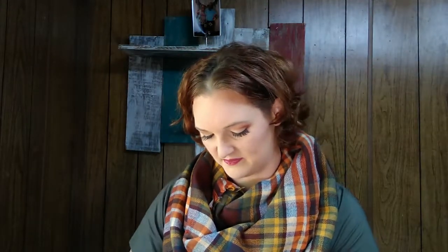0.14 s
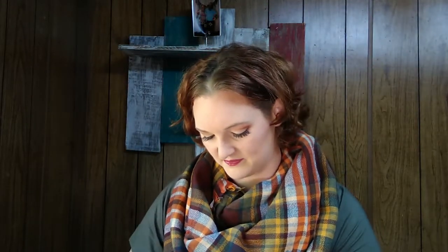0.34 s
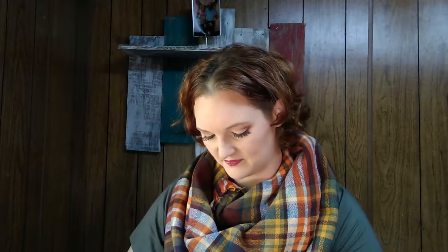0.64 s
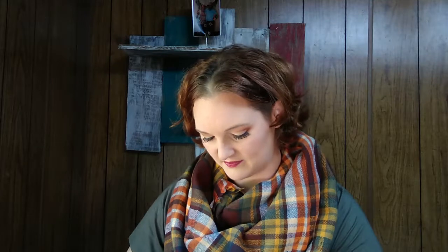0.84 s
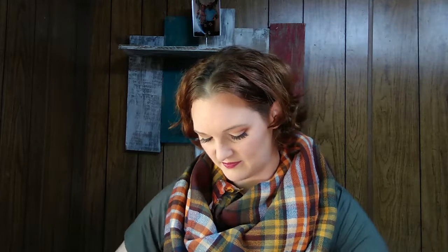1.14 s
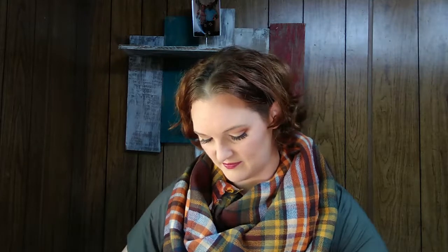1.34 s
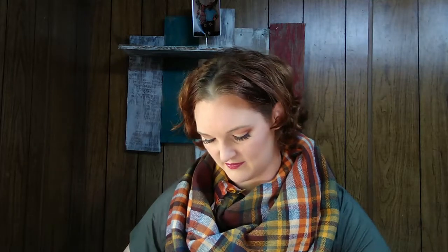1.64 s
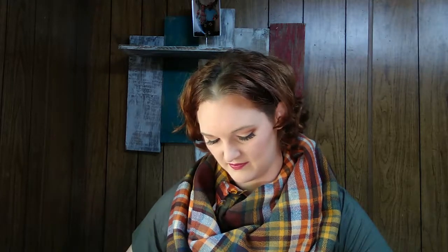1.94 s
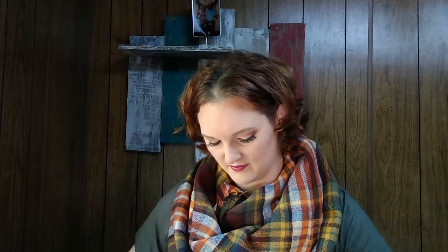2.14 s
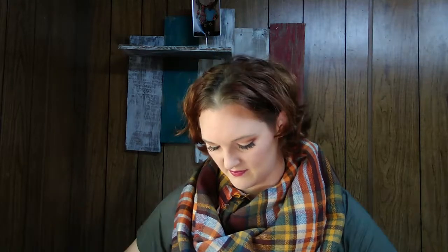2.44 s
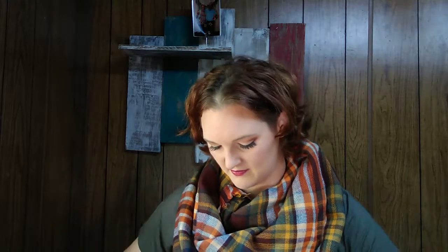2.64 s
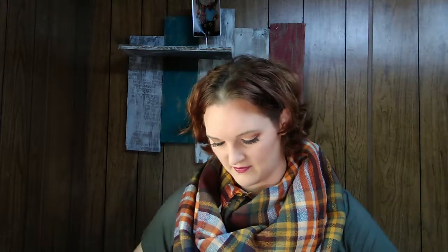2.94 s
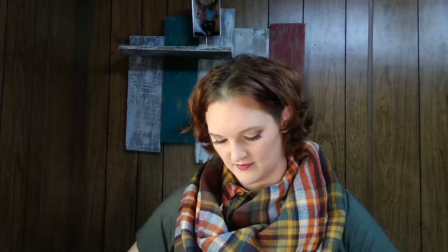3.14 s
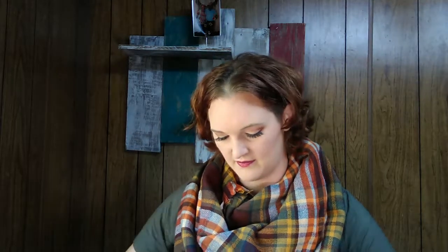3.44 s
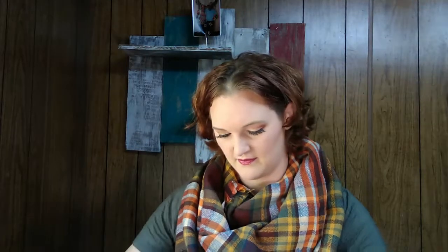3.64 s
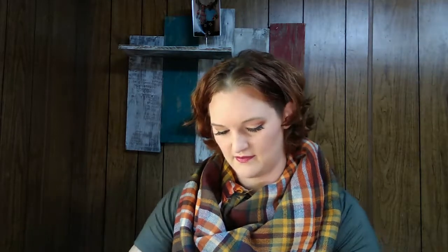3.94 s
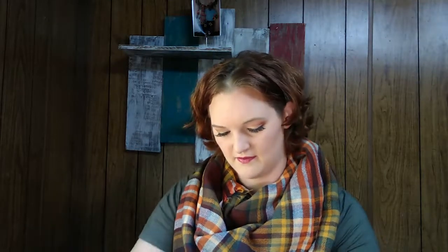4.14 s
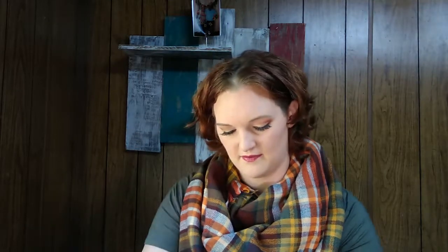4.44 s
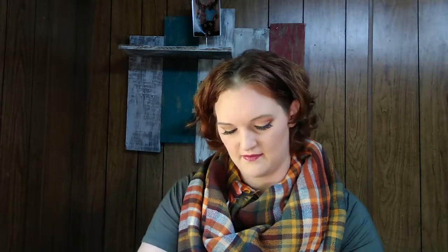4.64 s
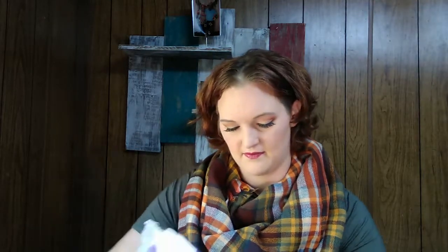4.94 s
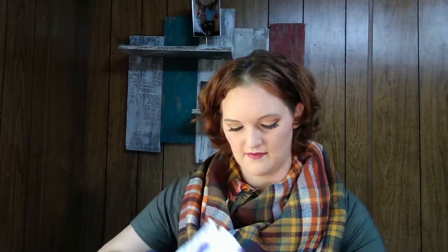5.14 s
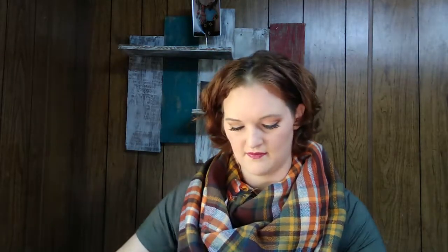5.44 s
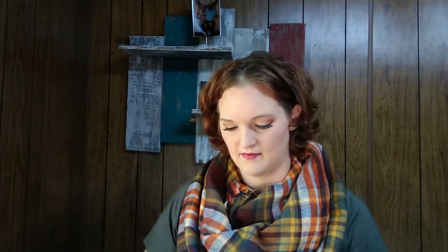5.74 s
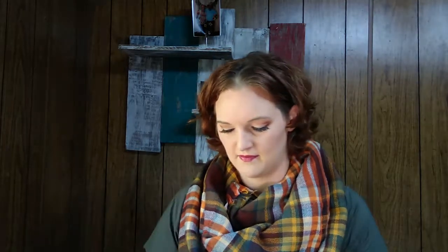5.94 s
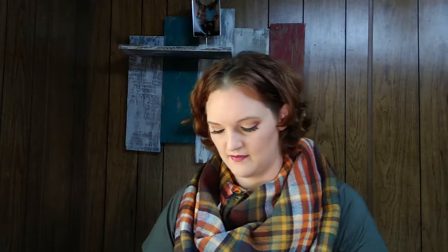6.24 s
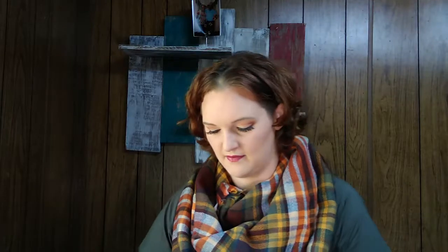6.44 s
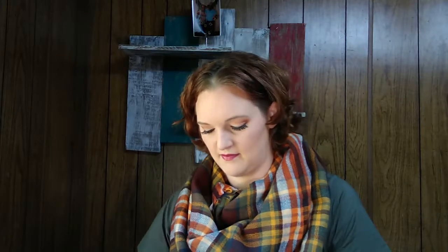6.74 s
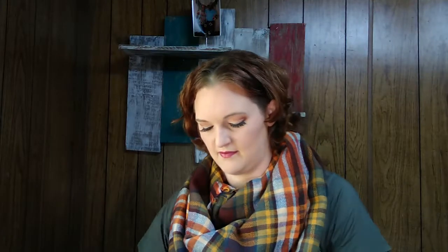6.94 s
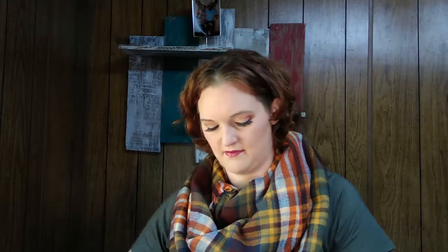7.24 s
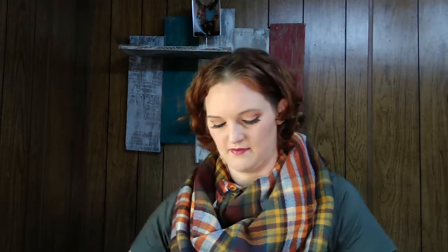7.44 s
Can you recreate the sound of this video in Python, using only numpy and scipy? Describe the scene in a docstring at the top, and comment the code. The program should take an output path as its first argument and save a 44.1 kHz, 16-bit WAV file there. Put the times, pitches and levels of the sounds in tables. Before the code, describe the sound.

Close, crisp paper crinkling and snapping as hands unwrap a box, with brief tears, fine sharp clicks and faint low cardboard bumps.

```python
"""A dense, dry crackle comes first: two hands pull wrapping paper off a box and crumple it in a small wooden room.
Thousands of random creases snap each second, and each rings a patch of paper: small patches crackle high and short,
large ones sound low and longer. Short rips and sharp single ticks stand out of the steady crumpling.
The cardboard box rumbles low and gives a dull note when bumped. Close, faint echoes surround it all.
Two microphone ports just above hear it with slightly different colour."""
import sys
import numpy as np
from scipy import signal
from scipy.fft import rfft, irfft, next_fast_len
from scipy.io import wavfile
from scipy.ndimage import uniform_filter1d

SR = 44100
rng = np.random.default_rng(int(sys.argv[2]) if len(sys.argv) > 2 else 0)


def dump(signal):
    """Clip the signal to [-1, 1] and save it as 16-bit WAV at the path in sys.argv[1]."""
    limited = np.clip(np.atleast_2d(signal).T, -1, 1)
    pcm = np.round(limited * 32767).astype(np.int16)
    wavfile.write(sys.argv[1], SR, pcm)


N = 334719  # length in samples


def gain_of(db):
    """Turns decibels into a factor for the sound wave."""
    return 10 ** (np.asarray(db) / 20)


def evened(x):
    """Scales a signal to an average strength (rms) of 1."""
    return x / np.sqrt(np.mean(x ** 2) + 1e-20)


def read(points, hz):
    """Reads a table of (frequency, value) between its points, on a log-frequency axis."""
    f, value = np.transpose(points)
    return np.interp(np.log(hz + 1), np.log(f + 1), value)


def add(mix, s, sound):
    """Mixes a sound in, starting at s seconds and cut off at the end of the mix."""
    part = mix[..., round(s * SR):][..., :sound.shape[-1]]
    part += sound[..., :part.shape[-1]]


def shaped(x, gain):
    """Filters a sound by a gain that is a function of frequency."""
    size = next_fast_len(x.shape[-1] + 2048)
    spectrum = rfft(x, size) * gain(np.fft.rfftfreq(size, 1 / SR))
    return irfft(spectrum, size)[..., :x.shape[-1]]


def alike(pair):
    """Blends two unrelated signals: long low waves reach both ports much alike, high ones differ."""
    # how alike left and right are: frequency_hz, likeness (1 = same, 0 = unrelated)
    likeness = [(60, .8), (150, .8), (330, .95), (600, .82), (1000, .38), (1400, .33), (2100, .48),
                (2500, .35), (3100, -.08), (4200, .1), (6000, 0)]
    shared = shaped(pair[0], lambda hz: read(likeness, hz))
    own = shaped(pair[1], lambda hz: np.sqrt(1 - read(likeness, hz) ** 2))
    return np.array([pair[0], shared + own])


def wrinkle_db(fold_db, crease_db):
    """Wrinkles lie between folds and creases in size, so their level follows both."""
    return 0.47 * fold_db + 0.55 * crease_db - 6.0


def hands_db():
    """How hard the hands work through time: drive levels of swing, flex, folds, wrinkles and creases."""
    # steady crumpling: time_s, crease_db, then levels above the creases: fold_db, flex_db, swing_db
    # (flex is the sheet bending, swing is the whole sheet moving); levels glide from one point to the next
    handling = [(0.0, -47.5, -9, -14.5, -35), (0.34, -48, -7.5, -12.5, -15.5), (0.55, -50, -10.5, -13, -43),
                (0.67, -53.5, 3.5, -4, -15), (0.8, -59.5, -14.5, -12, -42), (0.93, -50, 11, -3, -7),
                (1.08, -55.5, 1, -5.5, -9), (1.27, -58, -7.5, -11.5, -32), (1.39, -49.5, -2, -7.5, -9.5),
                (1.58, -47, -7, -10.5, -18.5), (1.73, -51, -8, -13.5, -22), (1.82, -49, 7.5, 3.5, -7),
                (2.01, -59.5, -11, -16.5, -30), (2.07, -52, -9.5, -13, -18), (2.2, -50.5, -3.5, -11.5, -23),
                (2.3, -57, -6.5, -15, -42), (2.39, -44, -9, -15.5, -18), (2.58, -42.5, -3.5, -10, -29.5),
                (2.62, -46.5, 0.5, -7.5, -18.5), (2.83, -69, -3.5, -10, -31), (3.0, -70, -10, -35, -40),
                (3.13, -58, -0.5, -5.5, -36), (3.28, -54.5, -6.5, -12, -31), (3.55, -47, -11, -14, -46),
                (3.61, -49.5, -4, -16, -26), (3.66, -45.5, -12, -16, -36), (3.85, -54.5, -7, -9.5, -31),
                (3.97, -62, -4.5, -21.5, -43), (4.18, -59, -6, -20, -35), (4.23, -56, 4, -12, -9),
                (4.35, -49, -8, -12, -29), (5.12, -38.5, -9.5, -12.5, -26.5), (5.3, -48, -5, -10.5, -15.5),
                (5.43, -47, -11, -14, -34), (5.69, -54.5, -3.5, -3.5, -10), (5.94, -53.5, -14, -22.5, -52),
                (5.98, -54.5, -12, -8.5, -25), (6.21, -41, -6.5, -11.5, -21.5),
                (6.38, -44.5, -7, -9.5, -26.5), (6.55, -43.5, -5, -11, -15.5), (6.72, -52.5, -7, -6.5, -32),
                (6.81, -44.5, -4.5, -5.5, -16), (6.91, -47, -8.5, -9.5, -24), (7.19, -62.5, 0.5, -0.5, -19),
                (7.25, -58, -9, -10.5, -42), (7.36, -48.5, -2, -4.5, -17), (7.44, -47.5, -7, -6, -23),
                (7.59, -37.5, -9, -19.5, -24)]
    s, crease, fold, flex, swing = np.transpose(handling)
    wrinkle = wrinkle_db(crease + fold, crease)
    sizes = (crease + swing, crease + flex, crease + fold, wrinkle, crease)
    time_s = np.arange(N) / SR
    return np.array([np.interp(time_s, s, db) for db in sizes])


def clicks(per_s, spread_db, clump_db, clump_s):
    """Creases giving way at random moments: most small, a few large, in clumps as a fold runs."""
    size = gain_of(spread_db * np.minimum(rng.exponential(1, N), 4.2))
    clump = evened(uniform_filter1d(rng.standard_normal(N), max(int(clump_s * SR), 2)))
    snaps = rng.random(N) < per_s / SR
    return evened(size * gain_of(clump_db * clump) * snaps)


def paper_colour(hz, low, high):
    """One band of the paper's spectrum, raised or lowered where the hollow box resounds."""
    # tone of the paper: frequency_hz, level_db (per Hz)
    paper_tone = [(100, -84), (170, -22), (300, -9), (466, -6), (735, -7.5), (1250, -8), (2300, -2),
                  (3500, -6), (4830, 3.5), (6180, -1), (8200, 0), (10500, 8.5), (12000, 6), (14000, 2),
                  (16000, -6)]
    # resonances of the hollow box under the paper: pitch_hz, width_hz, lift_db
    hollow = [(320, 5.7, 4.5), (550, 19, 0), (730, 15, -5), (1080, 140, 2.5), (1274, 11, 10), (1430, 13, 3),
              (1670, 9, 3.5), (2150, 22, -12.5)]
    lift_db = sum(db / (1 + (2 * (hz - f) / width) ** 2) for f, width, db in hollow)
    band = 1 / np.sqrt((1 + (hz / high) ** 12) * (1 + (low / (hz + 1)) ** 12))
    return band * gain_of(read(paper_tone, hz) + lift_db)


def sheet(drive, ring_s, colour, count):
    """Each click rings one patch of paper, which reaches the two ports along its own short paths."""
    grip = np.repeat(rng.integers(0, count, N // 1200 + 1), 1200)[:N]  # new grip every 1200 samples
    patch = (grip + rng.integers(0, 6, N)) % count  # the fingers work a few patches at a time
    t = np.arange(1024) / SR
    out = np.zeros((2, N))
    for k in range(count):
        ring = alike(rng.standard_normal((2, 1024)) * gain_of(-60 * t / ring_s))
        strength = np.linalg.norm(shaped(ring, colour), axis=1).mean()
        out += signal.oaconvolve(drive * (patch == k), ring / strength, axes=1)[:, :N]
    return shaped(out, colour)


def rip_levels():
    """Drive levels of the five sizes while a fold runs: a quick swell, then a dying away; swing stays silent."""
    # short rips: peak_s, level_db, rise_s, fade_s (time to fall 60 dB), fold_db (above the creases)
    rips = [(.06, -50, 0.014, 0.16, -11), (.1776, -45.5, .008, 0.22, -13), (0.301, -35, 0.0052, 0.059, -8),
            (.43, -49, 0.0087, .2, -10), (.6353, -39, 0.048, 0.27, -25), (0.677, -44, 0.022, 0.26, -9),
            (.833, -46, .004, 0.32, -32), (.896, -39, .005, 0.19, -30), (0.927, -33.5, .04, 0.64, -15.5),
            (1.01, -42, 0.03, 0.19, -4), (1.1968, -50, 0.01, 0.11, -7), (1.315, -48, 0.0031, 0.36, -7.5),
            (1.3711, -43, 0.021, 0.5, -20), (1.4639, -41.5, 0.014, 0.034, -13),
            (1.5522, -42, 0.031, 0.1, -9), (1.618, -31.5, 0.0054, 0.038, -22),
            (1.668, -38.5, .004, 0.14, -10.5), (1.681, -36.5, 0.018, 0.33, -20.5),
            (1.7435, -48, 0.012, .11, -27), (1.776, -41, 0.0043, 0.44, -16),
            (1.8333, -41.5, 0.029, 0.21, -21), (1.92, -48, .012, 0.089, -5), (2.0254, -49, 0.0076, 0.6, -8),
            (2.08, -58.5, 0.022, 0.35, -13), (2.1736, -43, 0.011, 0.1, -12), (2.337, -42.5, .005, .1, -14),
            (2.4871, -39, 0.032, 0.18, -16), (2.5981, -34.5, 0.016, 0.28, -20),
            (2.6996, -43.5, .025, 0.33, -11.5), (2.811, -59.5, 0.0041, .1, 1.5),
            (2.8273, -54, 0.0097, 0.13, -13), (2.985, -52, .004, .047, -28),
            (3.042, -53.5, 0.0059, .09, -16), (3.0587, -51.5, 0.0041, 0.056, -11),
            (3.121, -45.5, 0.0051, 0.32, -13), (3.2152, -47, .03, 0.21, -12),
            (3.357, -41, 0.022, 0.067, -13), (3.4078, -49, 0.0093, 0.053, -8),
            (3.4644, -49.5, 0.011, .1, -4), (3.6075, -35.5, 0.029, 0.085, -17),
            (3.7176, -44.5, 0.021, 0.12, -11), (3.8021, -40.5, 0.0069, 0.13, -13.5),
            (3.931, -48.5, 0.013, 0.037, -11), (3.989, -45, 0.0087, 0.041, -18.5),
            (4.1346, -56, .009, 0.052, -17), (4.1805, -37.5, .004, 0.038, -22),
            (4.209, -48, 0.0034, 0.2, -5.5), (4.2209, -37.5, .007, 0.46, -18.5),
            (4.2838, -45.5, 0.018, 0.073, -9), (4.3366, -43, .008, 0.095, -21),
            (4.3925, -41, .03, 0.13, -10.5), (4.4464, -51.5, 0.028, 0.095, -1.5),
            (4.54, -39.5, 0.0096, 0.25, -16.5), (4.6088, -40.5, 0.046, 0.36, -9.5),
            (4.7317, -43, 0.055, 0.12, -9), (4.8757, -45.5, 0.026, 0.1, -14), (4.9969, -37, .02, 0.15, -14),
            (5.08, -41, 0.033, 0.19, -12), (5.21, -36.5, 0.064, 0.6, -14), (5.376, -62, 0.0084, 0.062, -34),
            (5.49, -44, .03, 0.34, -14), (5.5661, -44, 0.036, 0.68, -8.5), (5.64, -46, 0.035, 0.29, -12),
            (5.71, -52, 0.018, 0.05, -6), (5.7928, -93.5, 0.0053, 0.26, -24),
            (5.8475, -54, 0.011, 0.17, -6), (6.002, -43.5, 0.047, 0.086, -9.5),
            (6.033, -54.5, .013, 0.077, -1), (6.073, -49, 0.0086, 0.028, -3),
            (6.15, -38, 0.0084, 0.38, -15.5), (6.236, -31, 0.014, 0.19, -15),
            (6.3456, -39.5, 0.012, 0.12, -11.5), (6.45, -40, .012, .19, -10.5),
            (6.5346, -36, 0.035, 0.27, -14.5), (6.5708, -35.5, .008, 0.05, -16),
            (6.646, -53.5, .011, 0.049, 4), (6.7225, -40, 0.019, 0.83, -19),
            (6.7941, -40.5, 0.029, 0.69, -15), (6.8651, -37.5, 0.038, 0.13, -15),
            (6.9995, -41.5, 0.011, 0.24, -10), (7.0777, -46, 0.0092, 0.031, -32),
            (7.136, -33, 0.0074, 0.043, -15.5), (7.273, -44.5, 0.0033, 0.9, -11),
            (7.3553, -42.5, 0.045, 0.43, -20), (7.4895, -40, 0.046, 0.16, -11.5)]
    # flex in a rip: level above folds (dB), change per dB of rip level, usual rip level (dB)
    rip_flex = (-5, 0.33, -40.5)
    flex_above_db, flex_per_db, usual_db = rip_flex
    levels = np.zeros((5, N))
    t = np.arange(SR // 4) / SR
    for s, peak_db, rise_s, fade_s, fold_db in rips:
        rise_s = min(rise_s, .06)
        swell = np.sin(np.pi / 2 * np.minimum(t / rise_s, 1))
        fade = gain_of(-60 * np.maximum(t - rise_s, 0) / fade_s)
        flex_db = fold_db + flex_above_db + flex_per_db * (peak_db - usual_db)
        sizes_db = np.array([[flex_db], [fold_db], [wrinkle_db(fold_db, 0)], [0]])
        add(levels[1:], s - rise_s, gain_of(peak_db + sizes_db) * swell * fade)
    return levels


def tick_blows():
    """One blow a tick, for the three small sizes; lesser ticks fall at random, stronger when the hands are busy."""
    # sharp single creases that stand out: start_s, blow_db (before the shares and pan below)
    ticks = [(.1199, -25), (.1758, -25), (0.299, -28), (.5437, -30), (.8283, -29), (1.1596, -64.5),
             (1.306, -35), (1.3875, -19), (1.4285, -23), (1.456, -25), (1.618, -30), (1.668, -31),
             (1.9076, -25), (2.0012, -42), (2.171, -20.5), (2.388, -26), (2.7263, -28), (2.871, -36),
             (2.9834, -35.5), (3.0593, -30), (3.1248, -40), (3.284, -28), (3.3552, -22), (3.409, -26),
             (3.4536, -39), (3.9225, -44), (3.9875, -27), (4.031, -38), (4.0877, -42), (4.1323, -31),
             (4.1517, -30), (4.209, -32), (4.3348, -23.5), (4.426, -31), (4.4828, -35), (4.5324, -25),
             (4.599, -27), (4.8037, -33), (5.7237, -38), (5.7908, -27), (5.8442, -30), (5.978, -24),
             (6.014, -24), (6.0729, -27), (6.1657, -24), (6.2385, -31), (6.2959, -18), (6.567, -24),
             (6.702, -25), (6.7501, -27), (7.1297, -25), (7.1846, -29), (7.2689, -40)]
    # shares of a tick: fold_db, wrinkle_db, crease_db
    tick_sizes_db = (-11, -8, 4)
    pan_mean_db, pan_spread_db = -7.5, 4  # left over right: on average the right is louder
    stray_count, stray_above_db, stray_spread_db = 90, 13, 4  # lesser ticks: level above the creases
    blows = np.zeros((5, 2, N))
    at = rng.integers(0, N, stray_count)
    stray_db = hands_db()[-1][at] + stray_above_db + stray_spread_db * rng.uniform(-0.91, 1, stray_count)
    for s, blow_db in [*zip(at / SR, stray_db), *ticks]:
        pan_db = pan_mean_db + pan_spread_db * rng.standard_normal()
        sides_db = blow_db + np.array([pan_db, -pan_db]) / 2
        blows[2:, :, round(s * SR)] = np.outer(gain_of(tick_sizes_db), gain_of(sides_db))
    return blows


def paper():
    """Crumpling, rips and ticks drive five sizes of buckling; larger patches sound lower and mostly ring longer."""
    # borders between the bands of swing, flex, folds, wrinkles and creases: frequency_hz
    split_hz = (380, 1400, 3500, 7000)
    # how long a patch rings, for swing, flex, folds, wrinkles and creases: ring_s (time to fall 60 dB)
    ring_s = (0.034, 0.029, 0.0065, 0.014, 0.0026)
    # how many different patches of each size, in the same order: count
    patches = (8, 10, 16, 20, 32)
    # the two ports differ in colour: frequency_hz, left_over_right_db
    lean = [(300, 1), (1000, -1), (2600, -5.5), (3800, 2.5), (5000, -1.3), (7000, 10), (8200, 8.5),
            (10000, -2), (12600, -8), (14000, -8), (15000, -5)]
    steady = gain_of(hands_db())
    crumple = clicks(per_s=4000, spread_db=2.0, clump_db=-1.32, clump_s=0.0042)
    rip = clicks(per_s=9000, spread_db=2.5, clump_db=0.7, clump_s=0.0019)
    edges = (1, *split_hz, SR)
    out = np.zeros((2, N))
    for k, (level, run, blow) in enumerate(zip(steady, rip_levels(), tick_blows())):
        colour = lambda hz: paper_colour(hz, edges[k], edges[k + 1])
        drive = level * crumple + run * rip + blow
        out += sheet(drive, ring_s[k], colour, count=patches[k])
    return shaped(out, lambda hz: gain_of(np.outer([.5, -.5], read(lean, hz))))


def box():
    """The cardboard box rumbles under the hands and gives a low, quickly damped note when bumped."""
    # tone of the handled box: frequency_hz, level_db (per Hz)
    card = [(30, -29), (60, -1.5), (110, -1.5), (160, 2), (200, -11), (300, -33), (600, -70)]
    # bumps of the box: start_s, level_db (before the soft onset), pitch_hz, fade_s (time to fall 60 dB)
    bumps = [(0.292, -66, 159, 0.12), (0.9, -47, 204, 0.12), (1.357, -51, 191, 0.061),
             (1.79, -64, 142, 0.123), (2.068, -59, 159, 0.099), (2.385, -40, 114, 0.1),
             (2.612, -65, 83.4, 0.12)]
    below_swing_db, rest_db = 20.5, -101  # rumble under the swinging sheet's level, and rumble at rest
    rumble = evened(shaped(alike(rng.standard_normal((2, N))), lambda hz: gain_of(read(card, hz))))
    out = rumble * (gain_of(hands_db()[0] - below_swing_db) + gain_of(rest_db))
    t = np.arange(SR // 3) / SR
    for s, level_db, pitch_hz, fade_s in bumps:
        onset = 1 - np.exp(-t / 0.011)
        add(out, s, gain_of(level_db - 60 * t / fade_s) * onset * np.sin(2 * np.pi * pitch_hz * t))
    return out


def room(x, count=4):
    """Sparse echoes of random sign, each band dying at its own speed; four patterns fade into one another in turn."""
    # how fast the room dies away: frequency_hz, fade_s (time to fall 60 dB)
    room_fade = [(200, 0.047), (2000, 0.079), (6000, 0.25), (14000, 0.19)]
    out = np.zeros((2, N))
    turn = np.arange(N) / SR / .09  # the next echo pattern takes over every 0.09 s
    slots = np.arange(180, SR // 3 - 20, 20)  # one echo somewhere in each slot of 20 samples
    for k in range(count):
        taps = np.zeros((2, SR // 3))
        at = slots + rng.integers(0, 20, (2, len(slots)))
        np.put_along_axis(taps, at, rng.choice([-1., 1.], at.shape), 1)
        hz, t, z = signal.stft(alike(taps), SR, nperseg=256)
        fade = gain_of(-60 * t / read(room_fade, hz)[:, None])
        tail = signal.istft(z * fade, SR, nperseg=256)[1]
        away = np.minimum(abs((turn - k + count / 2) % count - count / 2), 1)
        share = np.cos(np.pi / 2 * away)  # smooth fade from one pattern to the next
        out += signal.oaconvolve(x * share, tail / np.linalg.norm(tail[0]), axes=1)[:, :N]
    return out


def scene():
    """Paper and box, and the room around them 7 dB down."""
    near = paper() + box()
    return near + gain_of(-7.0) * room(near)


def record(dry):
    """Removes the treble above a steep upper limit of 15880 Hz."""
    lowpass = signal.firwin(511, 15880, window=("kaiser", 9), fs=SR)
    return signal.oaconvolve(dry, lowpass[None], "same")


dry = scene()
out = record(dry)
dump(out)
```